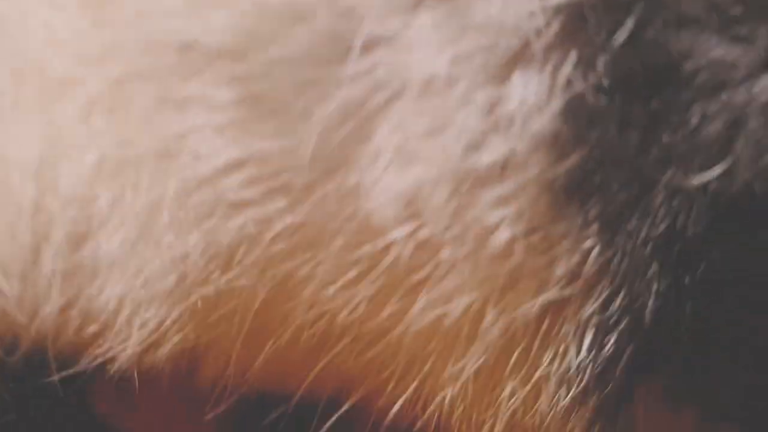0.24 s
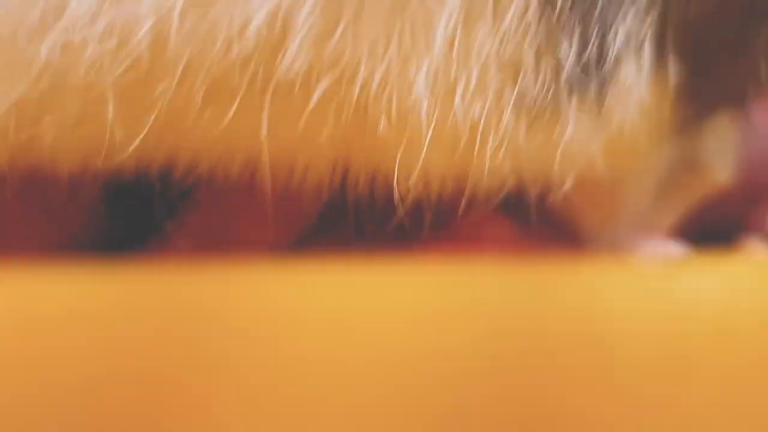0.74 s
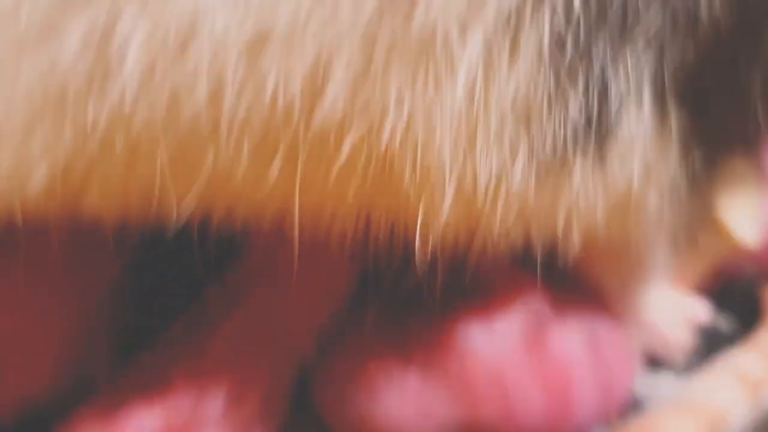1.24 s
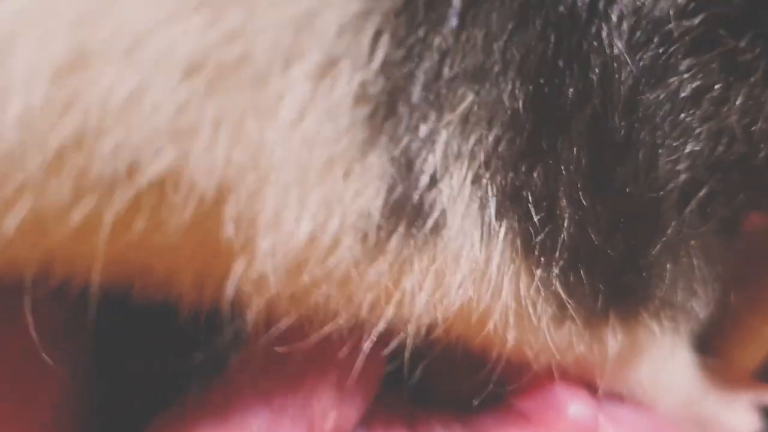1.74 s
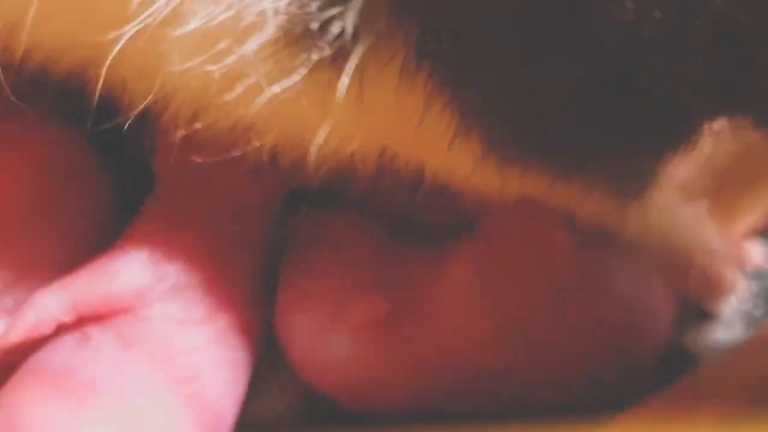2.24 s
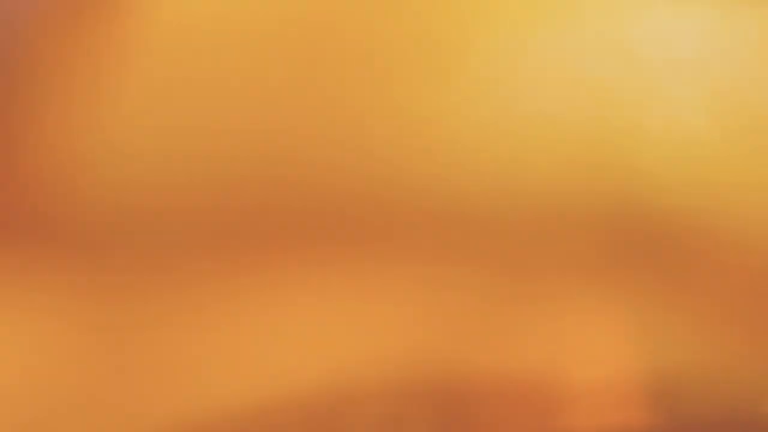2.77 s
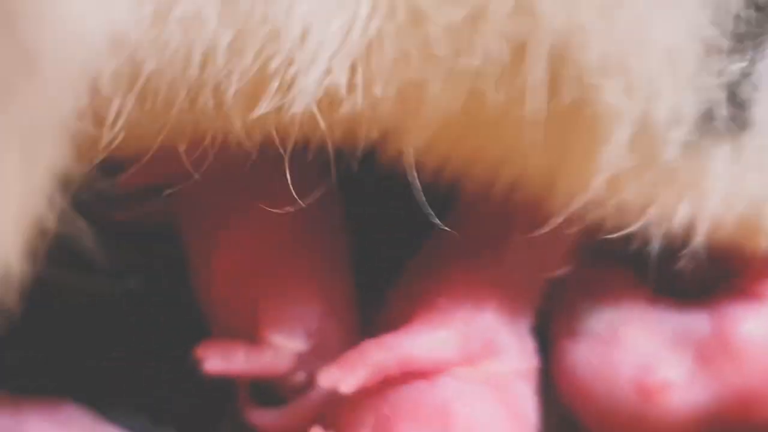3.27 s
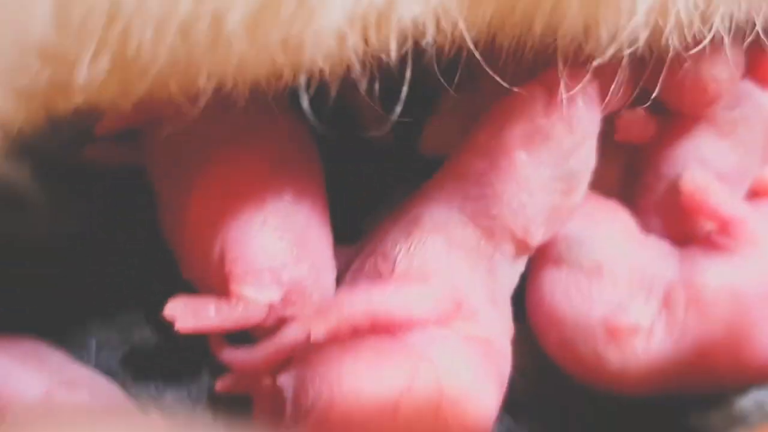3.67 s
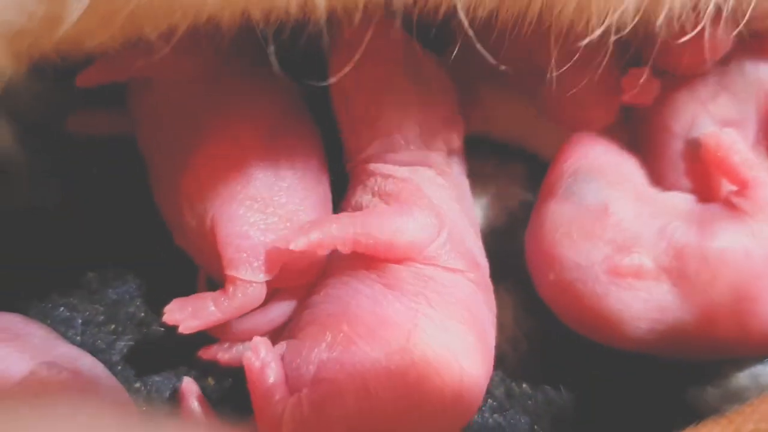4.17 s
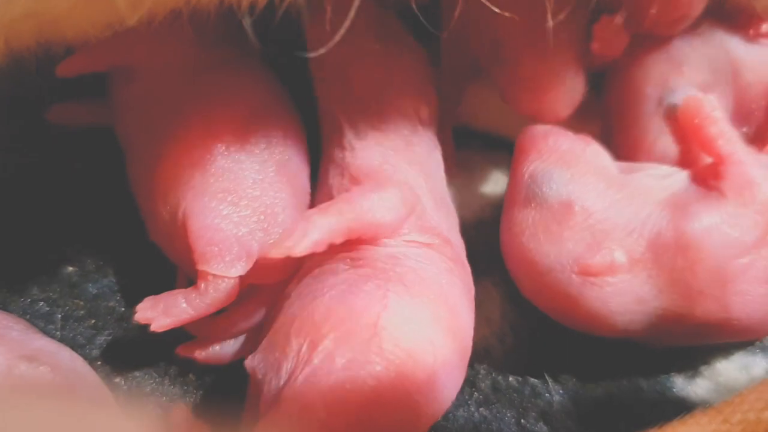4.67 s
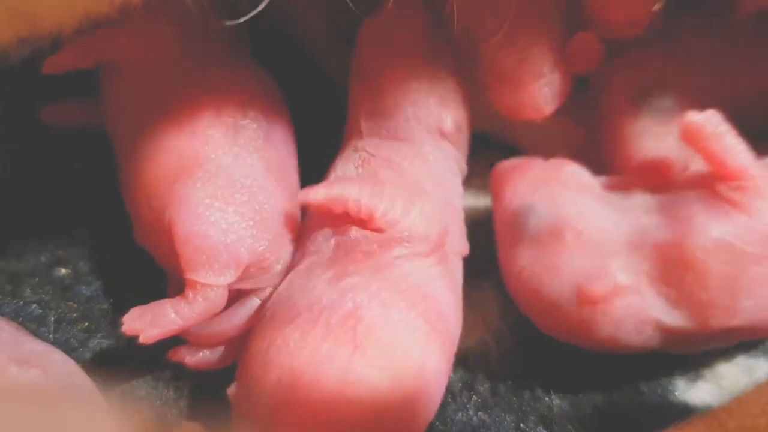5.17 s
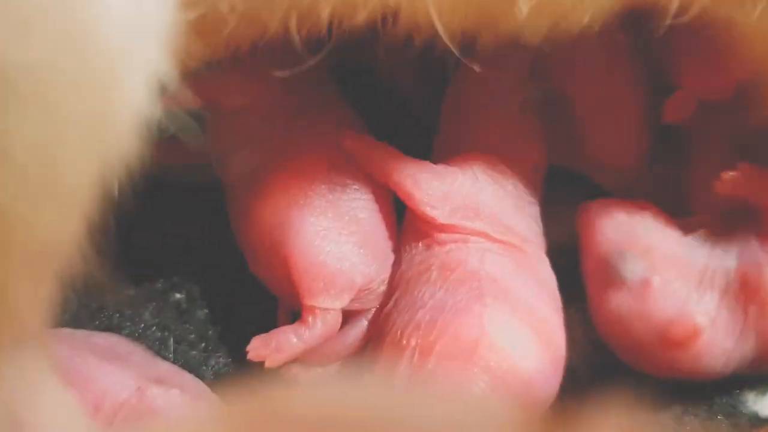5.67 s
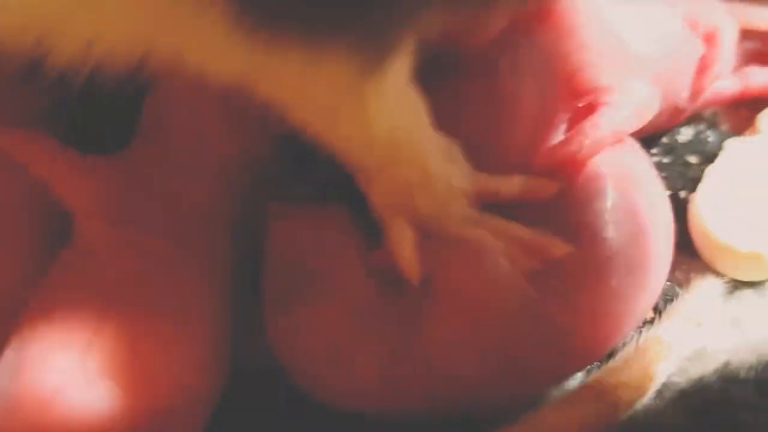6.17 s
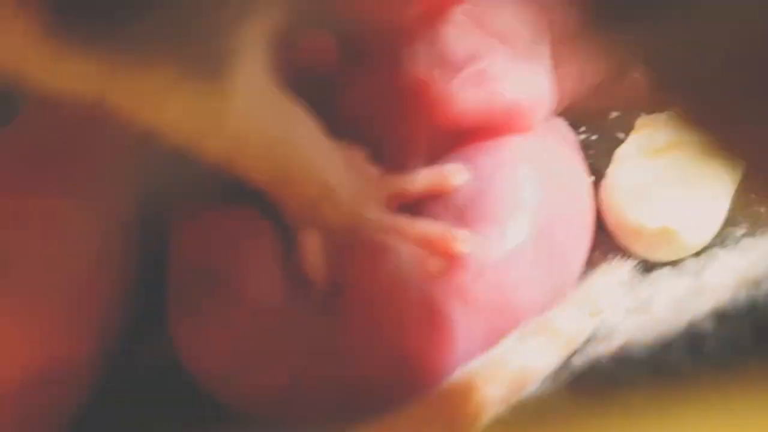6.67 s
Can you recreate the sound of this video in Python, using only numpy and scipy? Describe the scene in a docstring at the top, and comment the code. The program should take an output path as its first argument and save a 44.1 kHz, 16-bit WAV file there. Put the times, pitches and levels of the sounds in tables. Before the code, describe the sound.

A close stereo microphone catches a litter of hairless pups under their mother. After a quiet opening of faint ticks and air hiss, high squeals come one after another, bending and breaking hoarsely. Soft rubbing joins in from time to time. A few fainter, breathy peeps follow, then livelier cries with heavier rustling, a faint narrow whirr, and one soft woody knock. The space is small and nearly dry.

```python
"""A litter of newborn rats under their mother in a small nest box, very close to a two-port microphone.
From the start: mains hum, faint hiss and a little fur as filtered noise, and a patter of ringing mouth clicks.
From 0.66 s pups squeak: high whistles with overtones that gain half-pitch lines or break into rasp, through the throat.
Fur brushes past at 1 s; from 2.4 s bodies scrape and bump the box as lumpy bands of noise.
At 6.25 s a narrow band of noise whirrs; at 6.58 s a knock sets two decaying tones of the box wall ringing."""
import sys
import numpy as np
from scipy import signal
from scipy.fft import rfft, irfft, next_fast_len
from scipy.io import wavfile
from scipy.ndimage import uniform_filter1d, map_coordinates

SR = 44100
rng = np.random.default_rng(int(sys.argv[2]) if len(sys.argv) > 2 else 0)


def store_pcm(level_fs):
    """Save levels as 16-bit WAV."""
    pcm = np.round(np.clip(level_fs, -1, 1) * 32767).astype(np.int16)
    wavfile.write(sys.argv[1], SR, np.atleast_2d(pcm).T)


def undo_db(level):
    """Turn decibels back into plain size, where 20 dB means ten times bigger."""
    steps = np.asarray(level, float) / 20
    return 10 ** steps


N = 304731
TIME = np.arange(N) / SR


def unit(x):
    """Scaled to rms 1."""
    return x / np.sqrt(np.mean(x ** 2) + 1e-20)


def along(points, hz):
    """Reads a curve of (Hz, value) points on a log frequency axis."""
    f, v = np.transpose(points)
    return np.interp(np.log(hz + 1), np.log(f + 1), v)


def wobble(rate, size=N):
    """A smooth random curve, rate knots a second."""
    knots = rng.standard_normal(int(size * rate / SR) + 4)
    return map_coordinates(knots, [np.arange(size) * rate / SR])


def swell(start, end, db, edge):
    """A level that rises over edge seconds, holds and falls."""
    return undo_db(db) * np.clip(np.minimum(TIME - start, end - TIME) / edge, 0, 1)


# how alike noise is at the two ports, slightly opposed above the bass: pitch_hz, likeness (-1 to 1)
PORT_LIKENESS = [(300, 0.37), (1200, -0.17)]


def rush(gain, right_db):
    """Noise at both ports with a gain of frequency; the left port has rms 1 before right_db sets the right."""
    m = next_fast_len(N)
    hz = np.fft.rfftfreq(m, 1 / SR)
    turn = np.arccos(np.clip(along(PORT_LIKENESS, hz), -1, 1)) / 2
    spectra = rfft(rng.standard_normal((2, m))) * gain(hz)
    mid, side = irfft(spectra * [np.cos(turn), np.sin(turn)], m)[:, :N]
    return unit(np.array([mid + side, mid - side])) * undo_db([[0], [right_db]])


# colour of the hiss around the microphone, only its shape counts: pitch_hz, gain_db
AIR_COLOUR = [(20, -55), (60, -2), (220, -19), (500, -12.5), (900, -22.5), (4000, -33), (5500, -27),
              (8500, -36.5), (12000, -27.5), (15500, -32.5)]
# mains hum in narrow noisy lines: pitch_hz, level_db (rms, left port), width_hz
HUM_LINES = [(47.9, -69, 10), (97, -65.5, 6.6), (494.3, -69.5, 4)]


def room():
    """Steady air noise and unsteady hum lines, each line a resonance-shaped band of noise."""
    air = undo_db(-66.0 + wobble(3.72)) * rush(lambda hz: undo_db(along(AIR_COLOUR, hz)), right_db=-2.0)
    hum = 0
    for line_hz, level_db, width_hz in HUM_LINES:
        hum = hum + undo_db(level_db) * rush(
            lambda hz: 1 / (1 + (2 * (hz - line_hz) / width_hz) ** 2), right_db=-10.5)
    return air + hum


# colour of fur against fur, only its shape counts: pitch_hz, gain_db
FUR_COLOUR = [(1500, -1.5), (5000, -4), (9000, -6), (16000, -20)]
# fur brushing past the microphone: start_s, end_s, level_db
FUR_BRUSHES = [(.985, 1.045, -55), (5.83, 6.18, -60), (6.64, 6.96, -57)]


def fur():
    """Many small hairs rubbing make an uneven hiss, always faintly there and swelling at each brush."""
    hiss = undo_db(2.5 * wobble(14)) * rush(lambda hz: undo_db(along(FUR_COLOUR, hz)), right_db=-5)
    passing = sum(swell(*row, edge=.02) for row in FUR_BRUSHES)
    return (passing + undo_db(-78 + 6 * wobble(9))) * hiss


# the clearest mouth clicks and claw ticks: start_s, level_db (played 12 dB higher), treble_db (crack)
CLEAR_CLICKS = [(0.9686, -52.5, 8), (1.551, -53, 7), (2.9528, -47.5, 18.5), (3.537, -53.5, -4),
                (4.328, -51, -1), (5.18, -52, -11), (5.677, -64.5, 19), (6.1345, -46.5, 5.5),
                (6.6393, -47.5, 24.5), (6.6433, -41.5, 20), (6.6777, -53.5, 20.5), (6.704, -49, 10)]
# what a click rings with: pitch_hz (scattered from click to click), level_db, t60_s
MOUTH_RING = [(1400, 0, .008), (5400, -1, .004)]


def clicks():
    """Suckling mouths: clear clicks plus a patter of faint ones, each a short ring and a treble crack."""
    chance = rng.random((110, 3))
    faint_s = chance[:, 0] * N / SR
    faint_db = -65 + 11 * chance[:, 1] ** 2
    faint = np.c_[faint_s, faint_db, -18 + 12 * chance[:, 2]]
    out, t = np.zeros(N + SR), TIME[:400]
    for start_s, level_db, treble_db in [*CLEAR_CLICKS, *faint]:
        ring = sum(undo_db(db - 60 * t / t60) * np.sin(2 * np.pi * hz * rng.normal(1, 0.18) * t)
                   for hz, db, t60 in MOUTH_RING)
        bright_noise = np.diff(rng.standard_normal(len(t) + 1)) / 2
        crack = undo_db(treble_db - 60 * t / .006) * bright_noise
        out[round(start_s * SR):][:len(t)] += undo_db(level_db + 12) * (ring + crack)
    return out[:N] * np.array([[1], [-.45]])  # weaker and inverted at the right port


# throat and nest box together: pitch_hz, open_db (pup in the open), buried_db (pup under the mother)
THROAT_GAINS = [(790, -13, -4.5), (1290, -16, 20.5), (2350, -10, -27.5), (3000, -16, 4), (4410, -4.5, -3),
                (5100, -5, -18), (6676, 5.5, -17.5), (8460, -17, -34), (9180, -9, -18.5),
                (13340, -13.5, -19.5), (14100, -15.5, -35)]


def throat(hz, buried, bright_db):
    """Gain of throat and box, between an open and a buried pup, tilted by bright_db per octave above 1 kHz or so."""
    f, open_db, buried_db = np.transpose(THROAT_GAINS)
    gain_db = np.interp(hz, f, open_db + buried * (buried_db - open_db))
    tilt_db = bright_db * np.log2((hz + 1000) / 6000)
    return undo_db(gain_db + tilt_db) * (hz < 16000)


def stack(phase, hz, orders, colour, spread):
    """Multiples of a phase, weighted by the throat to a nominal rms of 1; each line wavers by spread dB."""
    gains = [throat(k * hz, *colour) for k in orders]
    lines = [g * undo_db(spread * wobble(303.0, len(hz))) * np.sin(k * phase + k * k)
             for k, g in zip(orders, gains)]
    return sum(lines) / np.sqrt(sum(g * g for g in gains) / 2)


def rasp(phase, strain, colour):
    """Chaotic voicing: half-pitch cycles slip at random and give way to breath as the voice fails."""
    n = len(phase)
    slips = np.cumsum(wobble(800, n)) * 2 * np.pi * 115 / SR  # smears the upper lines most
    cycles = sum(undo_db(4 * wobble(600, n)) * np.sin(k * (phase / 2 + slips) + k * k) for k in range(1, 18))
    voiced = unit(cycles) * (1 - colour[0]) * (1 - .6 * strain ** 4)
    breath = (.22 + .45 * strain ** 4) * rng.standard_normal(n)
    shaped = irfft(rfft(voiced + breath) * throat(np.fft.rfftfreq(n, 1 / SR), *colour), n)
    return unit(shaped) * undo_db(2.2 * wobble(140, n))


def at_ports(call, right_db):
    """The right port lies in the pups' shadow and hears calls inverted; one band comes later, round the box."""
    late = np.roll(call, round(.0003 * SR))
    round_box = signal.lfilter(*signal.iirpeak(5730, 1.4, SR), late)  # Hz, Q
    right = undo_db(-17.5) * call + undo_db(right_db) * round_box
    return np.array([call, -right]) * undo_db(-max(right_db, 0))  # a favoured right port turns both down


# one list of points per squeak: time_s, pitch_hz, effort_db
SQUEAK_PATHS = [
    [(0.658, 2610, -48), (0.69, 3000, -35.5), (0.75, 2953, -32.5), (0.774, 2573, -34.5), (0.79, 3130, -38),
     (0.81, 2880, -35), (0.826, 3090, -33), (0.897, 2556, -44)],
    [(1.155, 2620, -42), (1.215, 3080, -30), (1.24, 3250, -31), (1.31, 3316, -31.5), (1.342, 2810, -39),
     (1.36, 3000, -49), (1.375, 3060, -53)],
    [(1.33, 3240, -47.5), (1.625, 3267, -51.5)],
    [(1.628, 3516, -38.5), (1.73, 3370, -33), (1.77, 3640, -40), (1.777, 4360, -36), (1.815, 3960, -50.5)],
    [(1.886, 4250, -47), (1.897, 4400, -47), (1.9, 3700, -42), (1.97, 3282, -31.5), (1.98, 3900, -40),
     (1.99, 3760, -63)],
    [(2.192, 3410, -35), (2.24, 3145, -27), (2.295, 3000, -29.5), (2.33, 3170, -30.5), (2.39, 3096, -28.5),
     (2.45, 3466, -33.5), (2.53, 3416, -28.5), (2.587, 2905, -43.5)],
    [(2.832, 3474, -33), (2.852, 2990, -32.5), (2.875, 3250, -28), (2.9, 3023, -28.5), (2.962, 3474, -32),
     (3.02, 3446, -37), (3.033, 3913, -43), (3.092, 3860, -56.5)],
    [(3.452, 3030, -70), (3.46, 3234, -38.5), (3.48, 2970, -42), (3.53, 3240, -63)],
    [(3.609, 1744, -32.5), (3.622, 2217, -34), (3.655, 1228, -35.5), (3.672, 1210, -49)],
    [(3.985, 3000, -60), (4.04, 3206, -45.5), (4.18, 3037, -46.5), (4.208, 3060, -57.5), (4.36, 3000, -63)],
    [(4.455, 2900, -55.5), (4.55, 3270, -44.5), (4.6, 2796, -48), (4.645, 3230, -51), (4.672, 3470, -51)],
    [(4.93, 3400, -51), (5.0, 3620, -45.5), (5.05, 3480, -43.5), (5.078, 3250, -43.5), (5.13, 3530, -48),
     (5.14, 3880, -47), (5.165, 3750, -56)],
    [(5.443, 5170, -37), (5.455, 5690, -31), (5.47, 5070, -34), (5.484, 3000, -30.5)],
    [(5.445, 1644, -43), (5.515, 1610, -42.5)],
    [(5.495, 3280, -44), (5.53, 3430, -38), (5.565, 3494, -38.5), (5.62, 3370, -36), (5.64, 3520, -40.5),
     (5.644, 4060, -47), (5.662, 3900, -51)],
    [(5.865, 2760, -36.5), (5.955, 3100, -33.5), (5.97, 3250, -35.5), (6.02, 3560, -44), (6.048, 3970, -46)],
    [(6.245, 1460, -46.5), (6.29, 1743, -35), (6.31, 2450, -31), (6.355, 3000, -30.5), (6.392, 2634, -34),
     (6.45, 2933, -32), (6.47, 3296, -28.5), (6.5, 3373, -27), (6.605, 3250, -34.5), (6.617, 3660, -34)],
    [(6.737, 2550, -32), (6.76, 2597, -35.5), (6.782, 2250, -38)],
    [(6.788, 3390, -39.5), (6.83, 3110, -32), (6.85, 3300, -28), (6.89, 3580, -36), (6.92, 3250, -34)],
]
# the pup behind each squeak: right_db (late band at the right port against the left), buried (0-1),
# hoarse_db (rasp against the effort), bright_db (per octave)
PUP_VOICES = [(-4.5, 0.44, -9, 5), (-5, 0.28, -9, 4), (6.5, 0.66, -1.5, 0), (-5.5, 0.15, -11, 0.5),
              (-11.5, 0.01, -24, -4), (-13, 0.12, -19, 2), (-16, 0, -21.5, -1.5), (3, 0.14, -15, -5),
              (11, 0.2, -4, -2.5), (-1, 0.62, -3, 2.5), (-5.5, 0.56, -1, 1.5), (-10, 0.51, -12, 2),
              (16, 0.03, -13.5, -4), (-0.5, 0.49, -3.5, 2.5), (8, 0.31, -25, -2), (-8, 0.23, -9.5, 4),
              (-14.5, 0.25, -19, 5), (-14, 0, -19, -7.5), (-13.5, 0.36, -10, 6.5)]
# stretches where every second cycle differs: start_s, end_s, level_db (half-pitch lines against the whistle)
HALF_PITCH = [(0.66, 0.714, 0), (0.774, 0.82, 1.5), (1.216, 1.3, -8.5), (1.662, 1.765, -8.5),
              (2.332, 2.388, -13), (2.39, 2.491, -6.5), (4.125, 4.175, 1.5), (5.028, 5.057, -7.5),
              (5.083, 5.118, -8.5), (5.964, 6.036, 1)]
# stretches where the voice breaks into rasp: start_s, end_s, share (of the power, 0-1, before it flickers)
VOICE_BREAKS = [(0.656, 0.701, 0.65), (0.843, 0.892, 0.89), (1.15, 1.195, 0.91), (1.375, 1.631, 0.75),
                (1.686, 1.767, 0.61), (2.191, 2.254, 0.28), (2.333, 2.378, 0.53), (2.398, 2.432, 0.56),
                (3.99, 4.125, 0.96), (4.21, 4.359, 0.7), (4.455, 4.544, 1), (4.918, 4.988, 0.97),
                (4.986, 5.024, 0.47), (5.478, 5.498, 0.48), (5.854, 5.888, 0.81), (5.954, 5.98, 1),
                (6.236, 6.282, 0.98), (6.749, 6.788, 0.42), (6.83, 6.879, 0.36)]


def squeaks():
    """The effort of each call is shared between rasp and a clean whistle with its half-pitch lines."""
    tip_s = 0.00476  # how fast the voice tips over and recovers
    flicker, sag = .55, .13  # abruptness of flips between whistle and rasp; pitch share lost as rasp flips up
    out = np.zeros((2, N))
    half = sum(swell(*row, edge=0.0047) for row in HALF_PITCH)
    broken = sum(share * swell(a - tip_s, b + tip_s, 0, edge=tip_s) for a, b, share in VOICE_BREAKS)
    for path, (right_db, buried, hoarse_db, bright_db) in zip(SQUEAK_PATHS, PUP_VOICES):
        s, *cols = np.transpose(path)
        span = slice(int(s[0] * SR), min(int(s[-1] * SR), N))
        t = TIME[span]
        hz, effort_db = (uniform_filter1d(np.interp(t, s, c), size=300) for c in cols)
        strain = np.clip(broken[span], 0, 1)
        colour = buried, bright_db
        muffled = buried, bright_db - 4 * buried  # the lines fade upward sooner than the rasp

        flips = flicker * np.sqrt(strain * (1 - strain)) * wobble(160, len(t))
        share = np.clip(np.clip(strain + flips, 0, 1) + undo_db(2 * hoarse_db), 0, 1)
        unsteady = .002 + .04 * np.clip(share, 0, .5)  # the rasp shakes the pitch
        bent_hz = hz * (1 - sag * flips + unsteady * wobble(250, len(t)))
        phase = 2 * np.pi * np.cumsum(bent_hz) / SR

        whistle = stack(phase, hz, np.arange(1, 9), muffled, spread=0.16)
        whistle += half[span] * stack(phase / 2, hz / 2, np.arange(1, 12, 2), muffled, spread=2.5)
        voice = np.sqrt(1 - share) * whistle + np.sqrt(share) * rasp(phase, strain, colour)
        edge = np.clip(np.minimum(t - s[0], s[-1] - t) / 0.004, 0, 1)
        out[:, span] += at_ports(edge * undo_db(effort_db) * voice, right_db)
    return out


# bodies moving against the box: start_s, end_s, scrape_db, bump_db
BODY_SCRAPES = [(2.427, 2.656, -54.5, -83), (2.871, 3.074, -47, -76), (3.532, 3.834, -59.5, -58.5),
                (5.274, 5.47, -59, -65.5), (5.815, 6.214, -48.5, -67), (6.271, 6.516, -53.5, -51),
                (6.493, 6.736, -55.5, -48)]


def scrapes():
    """Bodies rub the box in lumps of noise around 540 Hz, with deeper bumps near 100 Hz."""
    scrape = undo_db(3.3 * wobble(30)) * rush(lambda hz: 1 / (1 + ((hz - 540) / 190) ** 2), right_db=-11.0)
    bump = undo_db(5.2 * wobble(8.8)) * rush(lambda hz: hz / 100 / (1 + (hz / 100) ** 3), right_db=-15.5)
    out = 0
    for start_s, end_s, scrape_db, bump_db in BODY_SCRAPES:
        rounded = swell(start_s, end_s, scrape_db, edge=0.068) ** 2 / undo_db(scrape_db)  # squared slopes
        out = out + rounded * scrape + swell(start_s, end_s, bump_db, edge=0.091) * bump
    return out


# one narrow whirr, stronger at the right port: start_s, end_s, level_db (left port)
WHIRR_SPAN = (6.25, 6.79, -60)


def whirr():
    """A narrow band of noise near 1.3 kHz swells and falls."""
    band = rush(lambda hz: 1 / (1 + ((hz - 1320) / 60) ** 2), right_db=6.0)
    return swell(*WHIRR_SPAN, edge=.03) * band


# a dull knock on the box: start_s, level_db (before the wall's own gains)
BOX_KNOCK = (6.578, -35)
# what the box wall rings with: pitch_hz, level_db (against the knock), t60_s
WALL_RING = [(510, 5.5, 0.027), (1010, 8.7, 0.0079)]


def knock():
    """One soft blow rings the box wall, weaker at the right port."""
    start_s, level_db = BOX_KNOCK
    t = np.clip(TIME - start_s, 0, None)
    ring = sum(undo_db(db - 60 * t / t60) * np.sin(2 * np.pi * hz * t) for hz, db, t60 in WALL_RING)
    return undo_db(level_db) * ring * np.array([[1], [.3]])


def box(x):
    """The small box answers with a brief diffuse tail, different at each port."""
    tail = rng.standard_normal((2, 3000)) * undo_db(-60 * TIME[:3000] / 0.18)  # t60 0.18 s
    return signal.fftconvolve(x, tail / np.linalg.norm(tail[0]), axes=1)[:, :N]


def scene():
    """Calls, clicks and the knock with their box tail, over hum, hiss, fur, scrapes and whirr."""
    near = clicks() + squeaks() + knock()
    return room() + fur() + near + undo_db(-28) * box(near) + scrapes() + whirr()


def low_pass(x):
    """Removes everything above the highest recorded frequency."""
    return signal.sosfilt(signal.butter(12, 17120, fs=SR, output="sos"), x)


def record(dry):
    """The finished mix of both microphone ports."""
    return low_pass(dry)


dry = scene()
out = record(dry)
store_pcm(out)
```